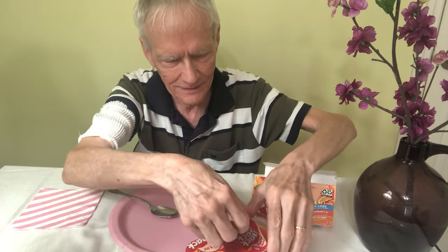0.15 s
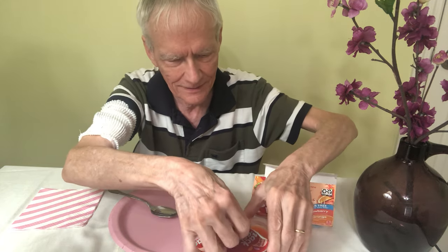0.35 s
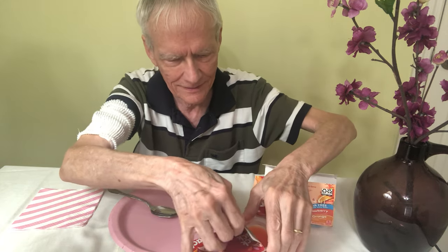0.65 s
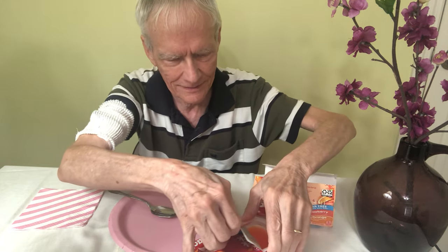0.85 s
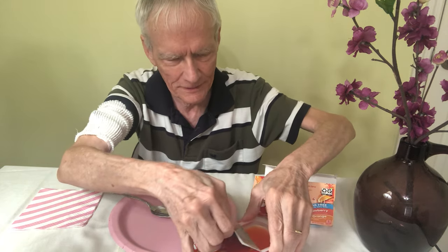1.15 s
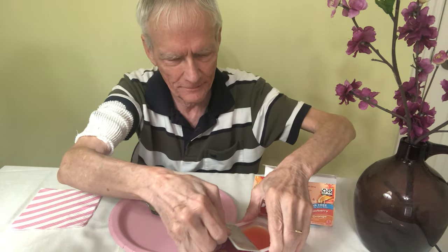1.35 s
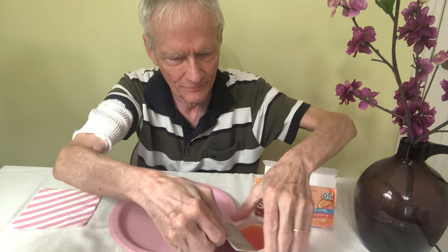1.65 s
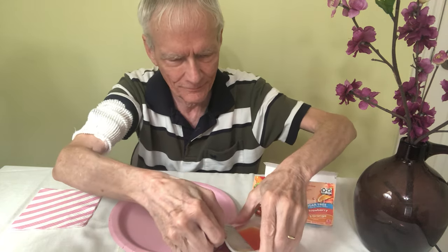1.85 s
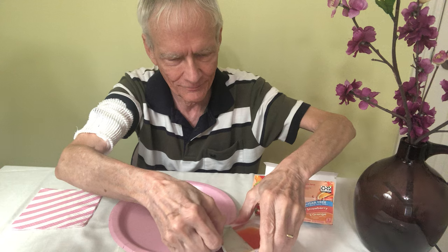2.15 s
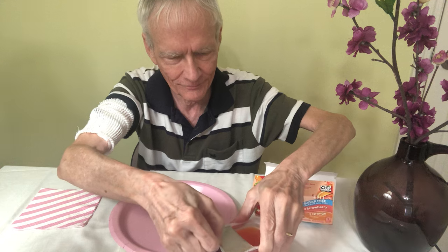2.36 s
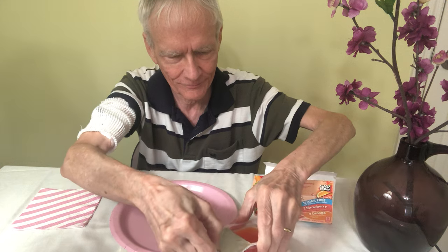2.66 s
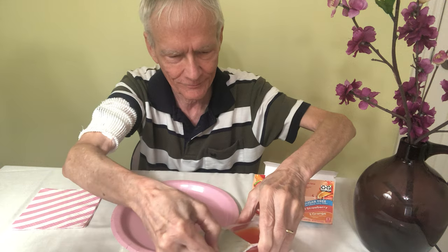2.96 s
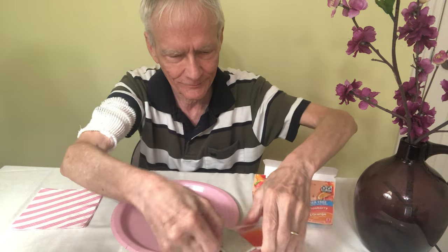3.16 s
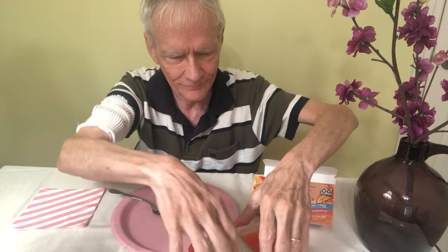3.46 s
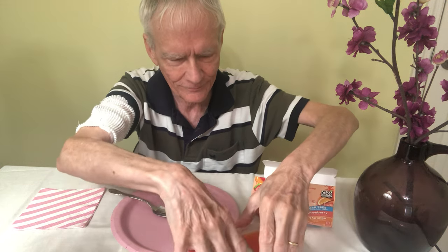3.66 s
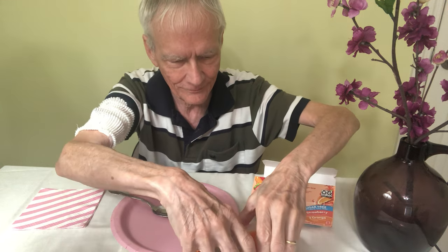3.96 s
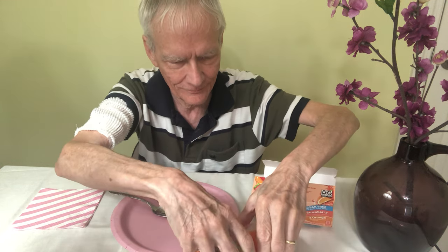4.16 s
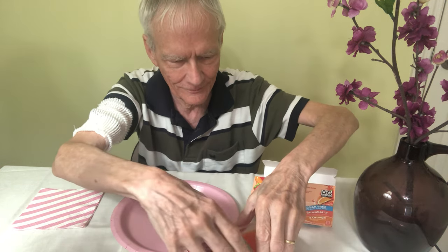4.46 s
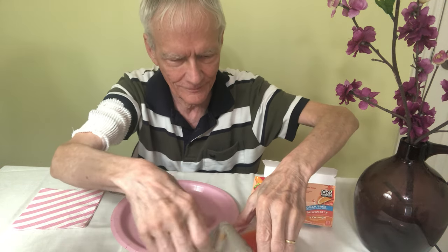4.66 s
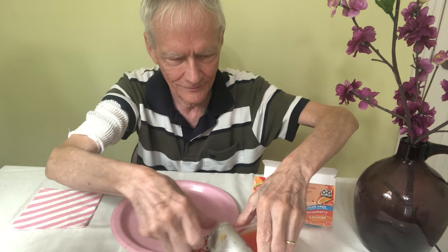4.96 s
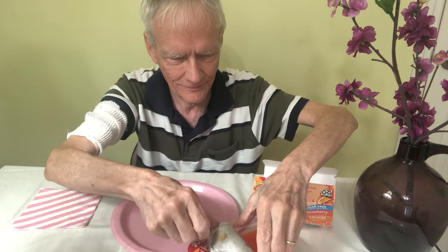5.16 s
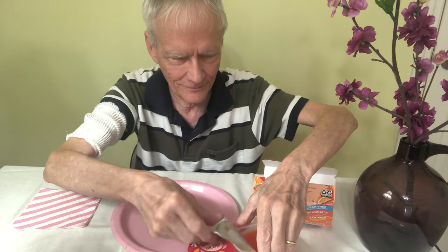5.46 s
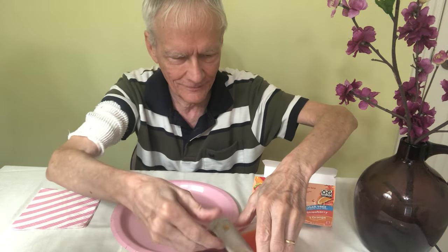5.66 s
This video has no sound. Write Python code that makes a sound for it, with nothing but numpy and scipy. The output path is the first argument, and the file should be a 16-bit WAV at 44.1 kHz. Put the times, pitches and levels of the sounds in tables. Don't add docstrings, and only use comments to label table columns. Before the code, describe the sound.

Sparse sharp foil snaps and hollow plastic clicks as a lid is tugged, with dull low table knocks in a quiet small room.

```python
import sys
import numpy as np
from scipy import signal
from scipy.fft import rfft, irfft, next_fast_len
from scipy.io import wavfile
from scipy.ndimage import uniform_filter1d, map_coordinates

SR = 44100
rng = np.random.default_rng(int(sys.argv[2]) if len(sys.argv) > 2 else 0)


def put_to_file(sound):
    columns = np.atleast_2d(sound).T
    safe = np.clip(columns, -1, 1)
    whole_steps = np.round(safe * 32767)
    wavfile.write(sys.argv[1], SR, whole_steps.astype(np.int16))


def undo_db(level):
    steps = np.asarray(level, float) / 20
    return 10 ** steps


N = 255537

# t/s, peak level/dB, cup f/Hz, cup level/dB, panel f/Hz
BUCKLES = [(.103, -30, 720, -9, 2220), (.161, -16, 754, -22, 2050), (.421, -13.5, 644, -27.5, 2160),
           (.439, -19.5, 1170, -35, 1990), (.471, -15.5, 1260, -46, 2150), (.59, -20.5, 1230, -13, 2010),
           (.774, 7.5, 890, -8.5, 3060), (1.215, -21, 590, -22, 3700), (1.226, -26.5, 581, -25, 3800),
           (1.254, -12.5, 716, -13.5, 3630), (1.26, -15, 710, -16, 1740), (1.609, -13, 825, -34, 2980),
           (1.676, -25, 507, -30, 1670), (2.24, -10, 1280, -3.5, 1650), (2.245, -7.5, 1460, -20, 1614),
           (2.534, -13, 753, -9.5, 1555), (3.195, -22.5, 1160, -14.5, 2927), (3.249, -5.5, 670, -17, 2830),
           (3.258, -5.5, 1290, -17, 2730), (4.28, -12, 1276, -10, 1740), (4.991, -32, 1236, -21, 1730),
           (5.414, -0.5, 946, -22, 1800)]
# t/s, peak level/dB, cup f/Hz, cup level/dB, panel f/Hz
CRACKS = [(.059, -21.5, 644, -19.5, 2010), (.072, -25.5, 726, -7, 2500), (.345, -16, 1230, -3, 1960),
          (.977, -22, 870, -14, 2270), (1.069, -45, 885, -2, 1670), (1.131, -35, 638, -12, 3940),
          (1.152, -27, 684, -33, 3040), (1.185, -22.5, 550, -22, 2200), (2.042, -34, 673, -5, 1730),
          (2.054, -18.5, 820, -13.5, 3950), (2.18, -33.5, 583, -35, 4200), (3.097, -26, 1010, -14, 3830),
          (3.352, -12.5, 1330, -19, 2480), (4.038, -12, 578, -21, 2410), (4.273, -13, 544, -12.5, 3000),
          (4.309, -17.5, 1300, -17, 1740), (4.397, -17.5, 1240, -32, 2000), (4.518, 1, 1400, -7.5, 2670),
          (5.212, -25.5, 1055, -5, 3230), (5.259, -25.5, 1150, -8.5, 1800), (5.298, -30, 1210, -10, 1770),
          (5.331, -17, 1390, -9, 2010), (5.432, -20, 1450, -30, 1660), (5.465, -2.5, 1370, -19, 2900)]
# f/Hz, level/dB
CRACK_COLOUR = [(2000, 8), (4500, 7.5), (7000, 1.5)]
# t/s, peak level/dB, ring f/Hz, decay/cycles
TAPS = [
    (0.191, -20, 705, 6.6),
    (0.242, -24.5, 560, 6.1),
    (0.703, -35, 431, 5.7),
    (0.728, -32, 576, 7.8),
    (0.768, -5.5, 780, 4),
    (0.843, -11, 820, 8),
    (1.197, -10.5, 553, 6.7),
    (1.807, -37, 520, 8.5),
    (2.027, -29, 727, 18.4),
    (4.006, -18.5, 1650, 8.9),
]
# t/s, f/Hz, level/dB, decay/cycles
OVERTONES = [(0.347, 1630, -27, 74), (0.3445, 2010, -21, 51), (0.775, 5920, -5, 35), (.775, 1800, -4, 16),
             (.775, 8600, -10, 40), (.774, 580, -12, 8), (4.519, 5000, -10, 30), (4.519, 1150, -9, 14),
             (1.262, 1150, -26, 20), (3.05, 650, -42, 20), (3.352, 2500, -24, 20), (2.028, 373, -34.5, 26),
             (2.24, 810, -13, 15.6), (2.246, 2290, -21.5, 71), (2.535, 1160, -17.5, 21),
             (2.535, 2240, -8.5, 11), (4.519, 507, -12, 3.9), (4.526, 1206, -17.5, 31),
             (5.415, 3400, -6, 27), (5.467, 7060, -3, 35), (5.466, 460, -17, 3.7)]
# t/s, f/Hz, level/dB, decay/cycles
PINGS = [(.44, 3500, -22, 33), (.441, 2100, -24, 45), (.452, 2270, -36, 34), (.472, 2900, -27, 21),
         (.473, 4040, -27, 30), (0.593, 3570, -29.5, 30), (.618, 2100, -32, 25), (.626, 3570, -29, 30),
         (.627, 2200, -31.5, 35), (0.784, 1750, -19, 40), (.786, 5870, -16, 40), (.822, 1730, -24, 40),
         (1.217, 3870, -31, 40), (1.227, 3700, -35, 31), (1.247, 3720, -38, 35), (1.255, 3800, -20, 50),
         (1.259, 3560, -22, 35), (1.269, 2040, -29.5, 40), (1.81, 1050, -34, 27), (3.196, 2800, -27.5, 35),
         (3.206, 3000, -37, 30), (3.249, 2780, -13, 20), (3.258, 2850, -13.5, 22), (3.268, 2900, -24, 40),
         (4.266, 3000, -22, 33), (4.288, 1760, -24, 30), (4.307, 5140, -23, 50), (4.31, 7500, -23, 60),
         (4.34, 6540, -26, 70), (4.39, 3800, -24, 30), (4.412, 1900, -27, 30), (4.472, 3000, -30, 50),
         (4.499, 7900, -28, 80), (4.529, 1285, -11.5, 34), (5.056, 2500, -45, 25), (5.146, 1740, -40, 28),
         (5.183, 2860, -37, 27), (5.194, 5000, -34, 50), (5.223, 3250, -36, 60), (5.26, 3430, -28, 34),
         (5.261, 5000, -36, 34), (5.333, 4900, -32, 44), (5.377, 4400, -39, 26), (5.415, 1775, -10, 30),
         (5.434, 7500, -28, 40), (3.264, 895, -17.5, 12), (3.272, 1700, -29, 18), (5.266, 1200, -31, 14),
         (5.238, 5000, -36, 30), (5.425, 1750, -22, 30)]
# start t/s, length/s, level/dB, centre f/Hz, brightness/dB
SCUFFS = [(0.053, 0.073, -36.5, 2100, -17), (0.425, 0.022, -36, 2250, -18), (0.62, 0.014, -39.5, 2360, -17),
          (1.215, 0.046, -43, 3870, -20), (1.594, 0.088, -46.5, 3300, -12),
          (1.997, 0.026, -53.5, 3520, -40), (2.259, 0.027, -48, 3900, -9), (2.558, 0.086, -35, 1200, -16),
          (3.04, 0.045, -41, 4600, -20), (3.232, 0.017, -38, 2000, -3.5), (3.548, 0.078, -44, 2770, -17),
          (3.637, 0.11, -41, 3160, -12.5), (3.905, 0.022, -34.5, 2970, -27), (3.94, 0.051, -45, 2500, -17),
          (4.02, 0.043, -31, 2570, -7), (4.063, 0.014, -37, 2500, -34), (4.259, 0.038, -34.5, 2500, -11.5),
          (4.309, 0.011, -28, 1410, -22), (4.492, 0.026, -30.5, 2860, -7.5), (5.04, 0.054, -46, 2440, -28),
          (5.17, 0.053, -47, 2500, -14), (5.496, 0.015, -35.5, 2870, -6)]
# start t/s, length/s, level/dB, centre f/Hz,
# brightness/dB
MORE_SCUFFS = [(1, 0.034, -47, 3620, -18), (1.111, 0.063, -48, 3300, -8.5), (1.742, .12, -49, 3300, -14.5),
               (2.191, .075, -48.5, 3200, -15), (2.666, 0.084, -46, 3400, -16),
               (2.74, 0.063, -46.5, 4000, -13.5), (3.089, 0.12, -47.5, 3700, -10),
               (4.24, 0.047, -47, 4000, -17), (4.345, 0.028, -35.5, 6500, -9), (4.362, 0.037, -33.5, 1800, -12),
               (4.386, 0.056, -40, 2600, -26), (5.253, 0.027, -45, 1490, -16), (2.58, 0.056, -53.5, 7000, 7),
               (5.18, 0.02, -46.5, 2800, -29), (5.333, 0.01, -40, 2400, -32), (5.4, 0.02, -36.5, 6500, -2),
               (5.28, 0.054, -49, 1900, -20), (5.36, 0.055, -50.5, 1200, -25), (4.415, 0.027, -37, 2000, -24),
               (2.568, .03, -50.5, 13000, -1), (0.35, 0.069, -43.5, 1700, -24), (2.268, .012, -48, 7600, -9)]
# t/s, length/s, from f/Hz, to f/Hz, level/dB
CREAK = (3.042, .026, 5200, 1900, -29.5)
# t/s, effort level/dB, grip on the cup/dB
RUBBING = [(0.0, -47, 1.5), (0.71, -57, -1), (1.06, -50, -0.5), (1.43, -53, -0.8), (2.67, -52, -1.5),
           (3.08, -52, -1), (3.21, -49, 2), (3.47, -51.5, -1), (3.89, -43, 1.5), (4.09, -74, 14),
           (4.31, -35.5, -1), (4.45, -33.5, -1), (4.72, -59, 8.5), (5.05, -60.5, 22), (5.34, -42.5, -1),
           (5.43, -45.5, 6), (5.6, -53, 0), (5.79, -57.5, -9)]
# f/Hz, width/Hz, level/dB
CUP_MODES = [(1230, 430, -9), (1740, 42, 3.5), (2010, 38, -3.5), (2520, 93, -3), (2900, 69, -2.5),
             (3860, 200, -0.5), (4630, 71, -2), (7200, 130, -4)]
# f/Hz, level/dB per Hz
FOIL_COLOUR = [(210, -20), (350, 2.5), (474, -1.5), (943, -6.5), (1260, -2), (1480, -6), (2000, -3),
               (9140, -13.5), (16000, -19)]
# t/s, peak level/dB
BUMPS = [(0.364, -39), (0.772, -28.5), (0.986, -28), (1.188, -24), (1.273, -23), (1.478, -42),
         (1.773, -8.5), (2.256, -27.5), (2.575, -29.5), (2.691, -7.5), (3.117, -14.5), (3.605, -57),
         (3.914, -39), (4.002, -35), (4.275, -32), (4.419, -27.5), (4.528, -29.5), (5.19, -37.5),
         (5.29, -42.5), (5.446, -32), (5.501, -31)]
# t/s, level/dB, f/Hz
CUP_POPS = [(1.259, -28, 330), (2.25, -26, 295), (1.612, -35, 260), (4.007, -27, 270), (5.45, -31, 209),
            (.424, -35, 390), (.583, -37, 440), (2.578, -31, 300), (2.608, -31, 330), (3.83, -39, 300)]
# start t/s, length/s, level/dB, hardness/dB
JOLTS = [(0.341, 0.18, -28.5, -9), (0.601, 0.048, -32.5, -48), (0.676, 0.053, -40, -36),
         (0.86, 0.035, -46, -2), (0.934, 0.2, -29, -10), (1.18, 0.22, -19, -18), (1.477, 0.046, -38.5, -8),
         (1.64, 0.047, -36.5, -4), (1.698, 0.034, -35, -11), (1.764, 0.22, -26.5, -5),
         (1.98, 0.21, -31.5, -9), (2.239, 0.19, -22, -10), (2.568, 0.089, -24, -1),
         (2.702, 0.14, -14, -10.5), (2.838, 0.082, -40, -7), (2.997, 0.049, -39, -9),
         (3.12, 0.25, -21.5, -6), (3.35, 0.069, -30.5, -21), (3.596, 0.12, -30, -19),
         (3.747, 0.089, -24, -28), (3.912, 0.084, -33.5, -8), (4.252, 0.12, -33.5, -22),
         (4.389, 0.15, -29, -7), (4.55, 0.056, -36, -9), (5.434, 0.11, -27.5, -6), (5.638, 0.05, -35, -33)]
# t/s, tremor level/dB, weight level/dB
LEANING = [(0.0, -45, -40.5), (1.24, -36, -38.5), (1.32, -34, -57), (1.51, -40, -33), (1.87, -45, -59),
           (2.29, -45, -29.5), (2.71, -52, -25.5), (2.79, -35, -25), (3.37, -42, -33.5), (3.93, -40, -33),
           (4.05, -38, -36), (4.97, -54, -43.5), (5.58, -37.5, -36), (5.79, -51, -46.5)]
# level under the tremor/dB, level under a jolt/dB
SHAKE_LEVELS = [(-7.5, -4), (-14, -4.5), (-12.5, -8)]
# f/Hz, width/Hz, level/dB
TABLE_LOW = [(63.2, 3.6, 9)]
# f/Hz, width/Hz, level/dB
TABLE_MID = [(93.6, 41, 0)]
# f/Hz, width/Hz, level/dB
TABLE_HIGH = [(156.9, 9.25, 6), (105.2, 6.6, -4.5), (202.5, 9, -17), (254, 35, -28), (238, 9.5, -13),
              (352, 7.5, -45), (470, 23, -21)]
# f/Hz, T60/s
ROOM_DECAY = [(300, 0.25), (1000, 0.42), (3000, 0.28), (8000, 0.34), (15000, 0.2)]
# delay/s, level/dB
WALLS = [(.0042, -29), (.0085, -32), (.0105, -25), (0.012, -15.5), (.019, -51), (0.029, -25)]
# f/Hz, level/dB per Hz
AIR_COLOUR = [(15, -22), (25, 10.5), (70, -7.5), (108, -16), (161, -16.5), (293, -23.5), (607, -29.5),
              (1700, -38), (3820, -40.5), (14800, -44), (16000, -43)]


def unit(x):
    return x / np.sqrt(np.mean(x ** 2) + 1e-20)


def along(points, hz):
    f, v = np.transpose(points)
    return np.interp(np.log(hz + 1), np.log(f + 1), v)


def curves(rows):
    s, *cols = np.transpose(rows)
    return [np.interp(np.arange(N) / SR, s, c) for c in cols]


def wobble(rate):
    knots = rng.standard_normal(int(N * rate / SR) + 4)
    return map_coordinates(knots, [np.arange(N) * rate / SR])


def add_at(out, s, sound):
    out[round(s * SR):][:len(sound)] += sound


def filtered(x, response):
    m = next_fast_len(len(x) + SR // 2)
    return irfft(rfft(x, m) * response(np.fft.rfftfreq(m, 1 / SR)), m)[:len(x)]


def modes(table):
    def response(f):
        return sum((-1) ** k * undo_db(db) * 1j * f * w / (c * c - f * f + 1j * f * w)
                   for k, (c, w, db) in enumerate(table))
    return response


def band(lo_hz, hi_hz):
    return lambda f: 1 / np.sqrt((1 + (lo_hz / (f + 0.081)) ** 4) * (1 + (f / hi_hz) ** 4))


def ring(hz, cycles, t):
    return undo_db(-60 * t * hz / cycles) * np.sin(2 * np.pi * hz * t)


def creases():
    kinds = [(BUCKLES, -27), (CRACKS, -11.5)]
    dulling = 0.11
    return sorted((*row, bright_db - dulling * (row[1] + 20)) for rows, bright_db in kinds for row in rows)


def snaps():
    out, t = np.zeros(N + SR), np.arange(4096) / SR
    f = np.fft.rfftfreq(len(t), 1 / SR)
    for s, db, cup_hz, cup_db, panel_hz, bright_db in creases():
        bottom = [(200, cup_db + 14), (900, cup_db + 18.5)]
        top = [(10000, 0.54 * bright_db + 5.0), (16000, 0.66 * bright_db + 0.5)]
        colour = along(bottom + CRACK_COLOUR + top, f)
        t60 = 0.014 * undo_db(0.077 * (db + 18.0))
        crack = unit(irfft(rfft(rng.standard_normal(len(t))) * undo_db(colour))) * undo_db(-60 * t / t60)
        body = undo_db(cup_db + 8.0) * ring(cup_hz, 19.3, t)
        body += undo_db(-4.0) * ring(panel_hz, 29.7, t)
        body += undo_db(-9.0) * ring(1.79 * panel_hz, 28, t)
        rise = 1 - np.exp(-(t / 0.0011) ** 2)
        add_at(out, s, undo_db(db - 2.5) * rise * (undo_db(0.34 * bright_db + 3.5) * crack + body))
    for s, db, hz, cycles in TAPS:
        wall = ring(hz, cycles, t) + undo_db(-4.0) * ring(1.88 * hz, cycles, t)
        add_at(out, s, undo_db(db + 6.5) * (1 - np.exp(-t / 0.0015)) * wall)
    for s, hz, db, cycles in OVERTONES + PINGS:
        add_at(out, s, undo_db(db) * (1 - np.exp(-t / 0.00024)) * ring(hz, cycles, t))
    return filtered(out[:N], modes([(2500, 87000, 0.029)]))


def scuffs():
    out = np.zeros(N)
    for s, length, db, hz, bright_db in SCUFFS + MORE_SCUFFS:
        n = round(length * SR)
        grain_level = np.repeat(rng.standard_normal(SR // 512), 64)[:n]
        grit = rng.standard_normal(SR // 8)[:n] * undo_db(1.7 * np.clip(grain_level, -2, 1.5))
        colour = [(hz / 8, -20), (hz / 3, -9), (hz / 1.3, -5), (hz, 0), (hz * 1.17, -5),
                  (max(9000, hz * 1.3), bright_db), (16000, 2.3 * bright_db - 2.5)]
        gain = undo_db(along(colour, np.fft.rfftfreq(n, 1 / SR)))
        swell = np.sin(np.linspace(0, 1, n) ** 0.76 * np.pi)
        add_at(out, s, undo_db(db) * swell * unit(irfft(rfft(grit) * gain, n)))
    s, length, from_hz, to_hz, db = CREAK
    glide = np.linspace(1, 0, round(length * SR)) ** 1.6
    pitch = to_hz * (from_hz / to_hz) ** glide
    rough = 0.8 + 0.5 * wobble(700)[:len(pitch)]
    tone = np.sin(2 * np.pi * np.cumsum(pitch) / SR)
    add_at(out, s, undo_db(db) * rough * np.hanning(len(pitch)) * tone)
    return out


def settling():
    kicks, t = np.zeros(N), np.arange(SR // 2) / SR
    for s, db, *_ in creases():
        kicks[round(s * SR)] = undo_db(1.15 * db - 36.5)
    t60_s, rise_s = 0.34, 0.0056
    decay = undo_db(-60 * t / t60_s) * (1 - np.exp(-t / rise_s))
    return np.abs(signal.fftconvolve(kicks, decay)[:N])


def rustle():
    effort_db, grip_db = curves(RUBBING)
    slips_per_s = 1500
    slips = (rng.random(N) < slips_per_s / SR) * undo_db(2.1 * rng.exponential(size=N)) * rng.standard_normal(N)
    clumps_db = np.clip(2.5 * wobble(60) + 5.9 * wobble(22.207), -5, 5)
    drag = (unit(slips) * 0.88 + rng.standard_normal(N)) * undo_db(clumps_db)
    cup = modes(CUP_MODES)
    foil = filtered(drag, lambda f: undo_db(along(FOIL_COLOUR, f)) * (0.82 + np.abs(cup(f))))
    layers = [(-9.5 - grip_db, 2000, 6000), (-5.5 + grip_db, 450, 2000),
              (-14.5 - 0.79 * grip_db, 6000, 20000)]
    effort = np.maximum(undo_db(effort_db) - undo_db(-61), 0) + settling()
    return effort * sum(undo_db(db) * unit(filtered(foil, band(lo, hi))) for db, lo, hi in layers)


def jolts():
    soft, hard = np.zeros(N + SR), np.zeros(N + SR)
    lead_s, trail_s = 0.024, 0.025
    for s, length, db, hard_db in JOLTS:
        n = round((lead_s + length + trail_s) * SR)
        swell = undo_db(db) * np.sin(np.linspace(0, 1, n) ** 0.78 * np.pi) ** 2
        add_at(soft, s - lead_s, swell)
        add_at(hard, s - lead_s, undo_db(hard_db) * swell)
    return soft[:N], hard[:N]


def steadied(x):
    return unit(x / np.abs(signal.hilbert(x, next_fast_len(N))[:N]))


def table_knocks():
    blows, t = np.zeros(N), np.arange(SR // 10) / SR
    for s, db in BUMPS:
        blows[round(s * SR)] = -undo_db(db + 58.5)

    def blow_on_top(f):
        flesh = (undo_db(-15.0) + np.exp(-2j * np.pi * f * 0.00646)) / (1 + 1j * f / 330) ** 6
        return flesh * (modes(TABLE_HIGH)(f) - modes([(60.5, 7, 3)])(f))

    knocks = filtered(blows, blow_on_top)
    for s, db, hz in CUP_POPS:
        add_at(knocks, s, undo_db(db) * ring(hz, 11.8, t))
    return knocks


def leaning_noise(top):
    stiff = band(39, 540)

    def response(f):
        return modes(top)(f) * stiff(f)

    tremor = steadied(filtered(rng.standard_normal(N), response))
    return unit(filtered(tremor, response))


def table():
    knocks = table_knocks()
    tremor_db, sway_db = curves(LEANING)
    soft, hard = jolts()
    pressed = np.minimum(1, uniform_filter1d(np.abs(knocks), SR // 40) / 0.03)
    soft = soft * undo_db(-6 * pressed)
    shake = np.zeros(N)
    tops = [(soft, TABLE_LOW), (hard, TABLE_MID), (hard, TABLE_HIGH)]
    for (rest_db, jolt_db), (push, top) in zip(SHAKE_LEVELS, tops):
        level = undo_db(tremor_db + rest_db + 2.7 * wobble(8.2)) + undo_db(jolt_db) * push
        shake += level * leaning_noise(top)
    sway = unit(filtered(rng.standard_normal(N), lambda f: band(1.5, 7)(f) ** 2))
    return knocks + shake + undo_db(np.minimum(sway_db, -20)) * sway


def room(x):
    out, step = np.zeros(N + SR), SR // 4
    for start in range(0, N, step):
        hz, t, z = signal.stft(rng.standard_normal(SR // 2), SR, nperseg=256)
        decay = undo_db(-60 * t / along(ROOM_DECAY, hz)[:, None])
        tail = signal.istft(z * decay, SR, nperseg=256)[1][:SR // 2]
        onset = 1 - np.exp(-np.arange(len(tail)) / SR / 0.0008)
        tail *= undo_db(-7.5) * onset / np.linalg.norm(tail)
        for delay, db in WALLS:
            tail[round(delay * SR)] += undo_db(db)
        wet = signal.fftconvolve(x[start:start + step], tail)
        out[start:start + len(wet)] += wet
    return out[:N]


def air():
    hiss = filtered(rng.standard_normal(N), lambda f: undo_db(along(AIR_COLOUR, f)) * band(36, 30000)(f))
    return undo_db(-44) * unit(hiss)


def scene():
    lid = snaps() + scuffs() + rustle()
    return (lid + room(lid) + table() + air())[None]


def roll_off(x):
    return signal.sosfilt(signal.butter(12, 17040, fs=SR, output="sos"), x)


def record(dry):
    top_hz, ceiling = 15900, 0.8
    x = filtered(dry[0], lambda f: np.where(f < top_hz, 1, undo_db(-35.5)))[None]
    x = x / (1 + np.abs(x / ceiling) ** 8) ** (1 / 8)
    return roll_off(x)


dry = scene()
out = record(dry)
put_to_file(out)
```